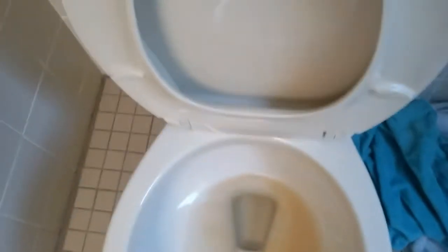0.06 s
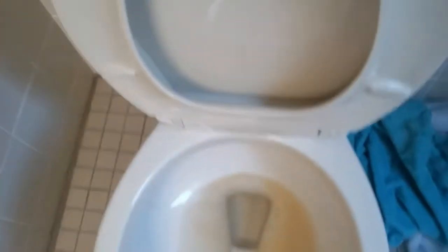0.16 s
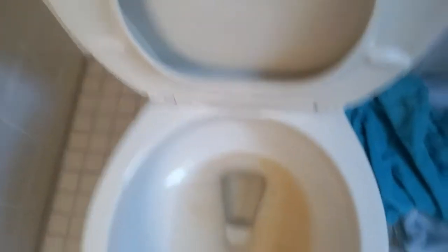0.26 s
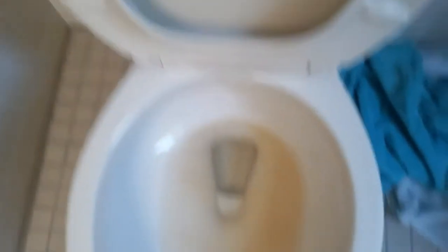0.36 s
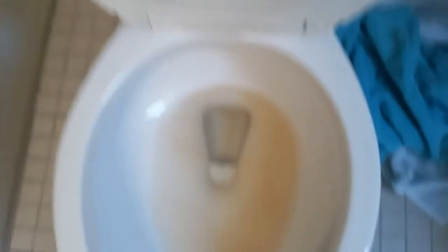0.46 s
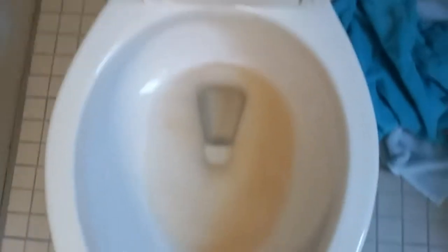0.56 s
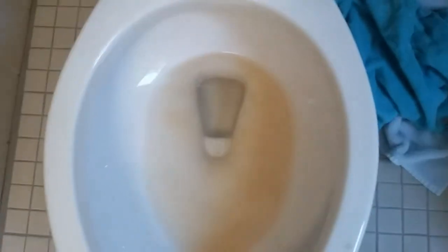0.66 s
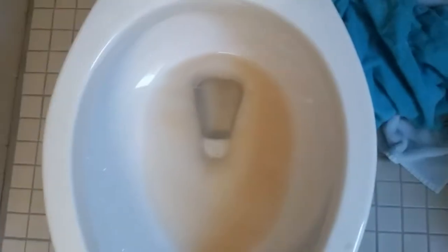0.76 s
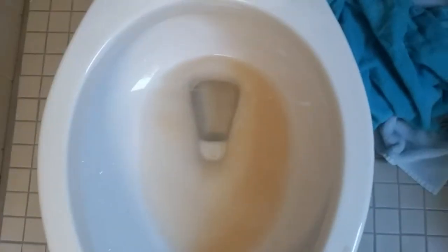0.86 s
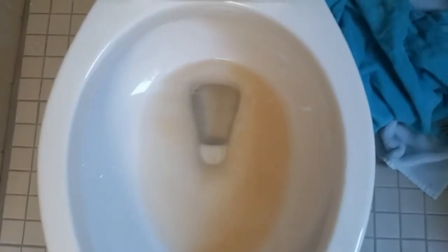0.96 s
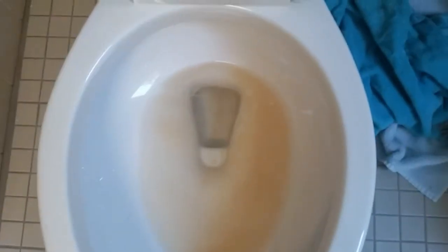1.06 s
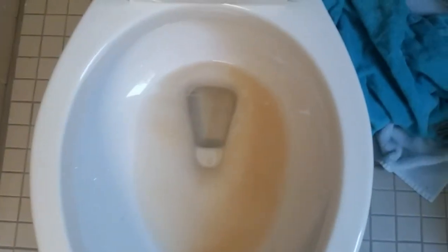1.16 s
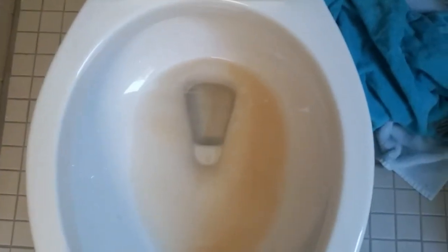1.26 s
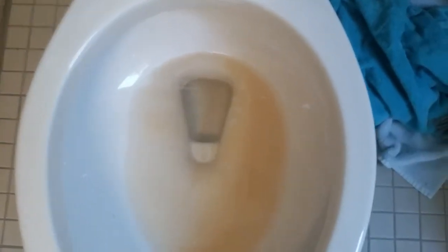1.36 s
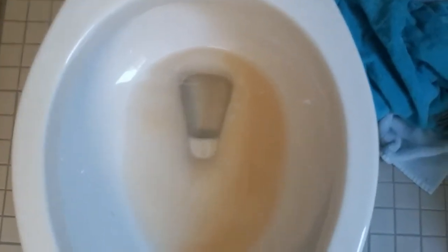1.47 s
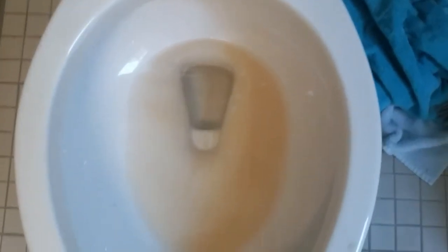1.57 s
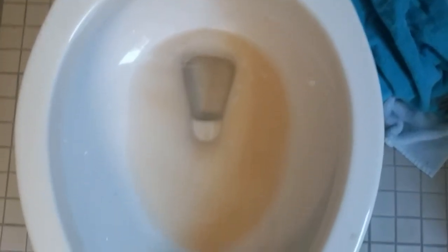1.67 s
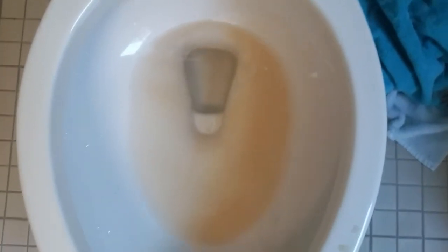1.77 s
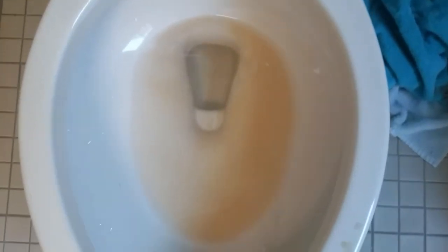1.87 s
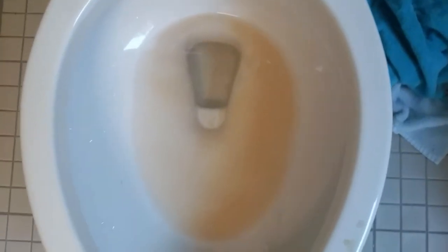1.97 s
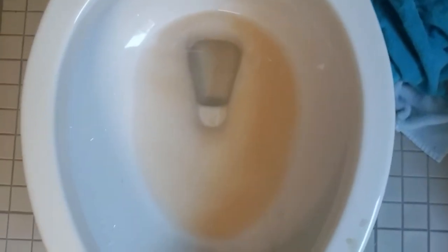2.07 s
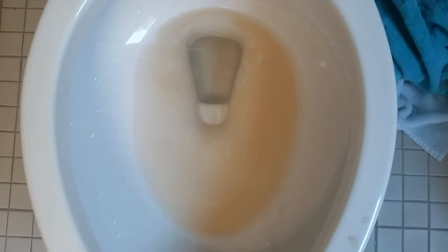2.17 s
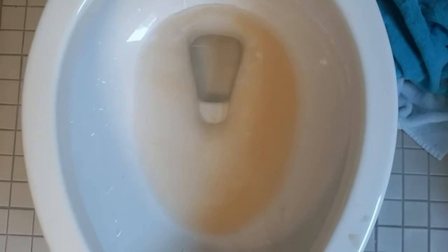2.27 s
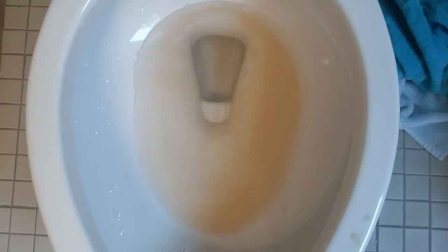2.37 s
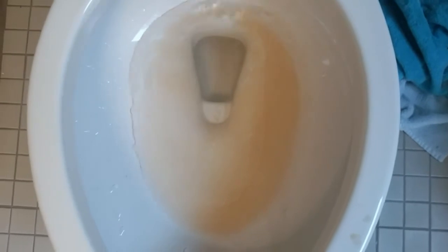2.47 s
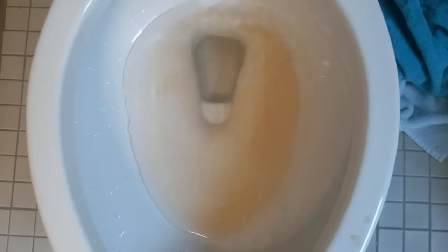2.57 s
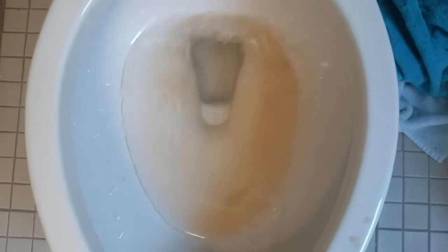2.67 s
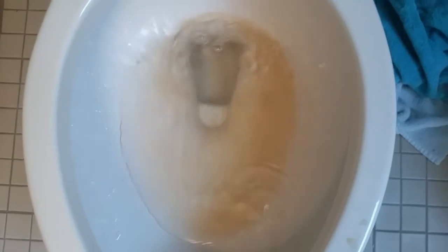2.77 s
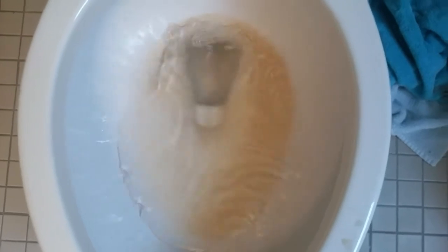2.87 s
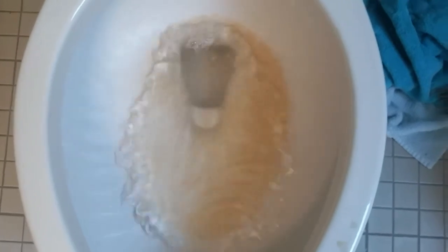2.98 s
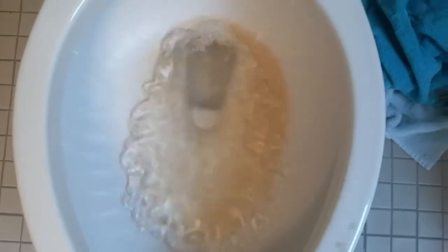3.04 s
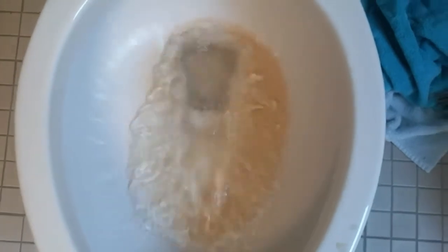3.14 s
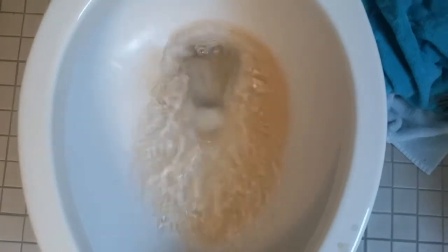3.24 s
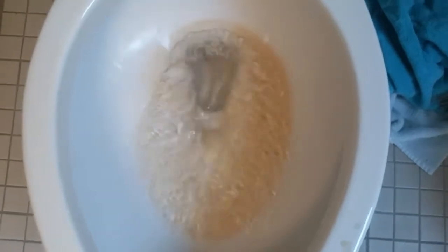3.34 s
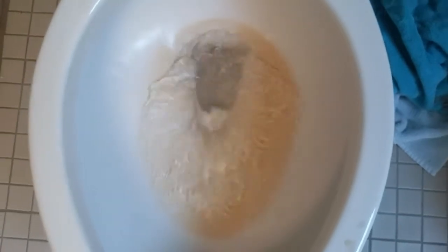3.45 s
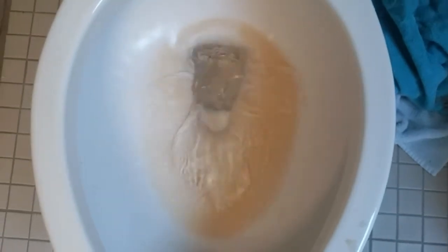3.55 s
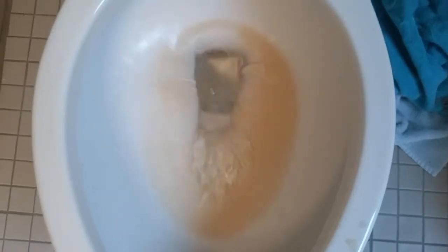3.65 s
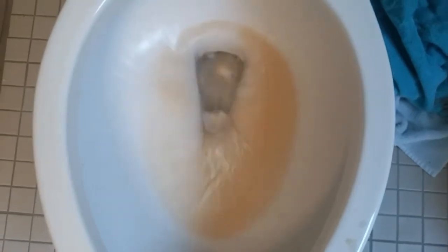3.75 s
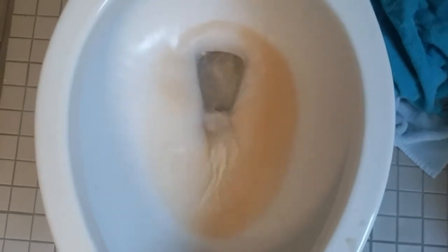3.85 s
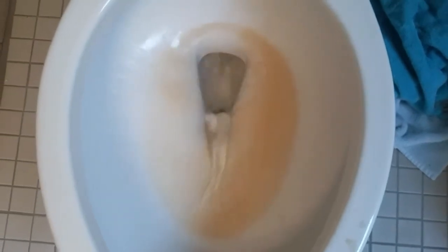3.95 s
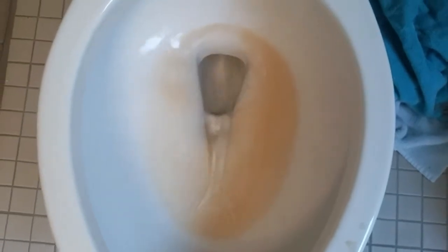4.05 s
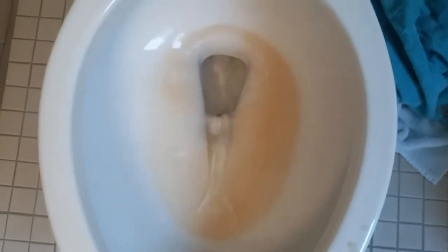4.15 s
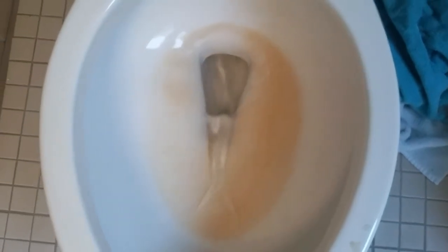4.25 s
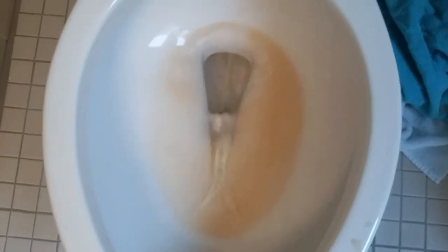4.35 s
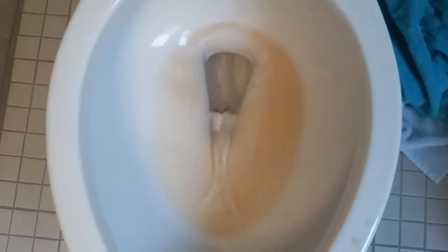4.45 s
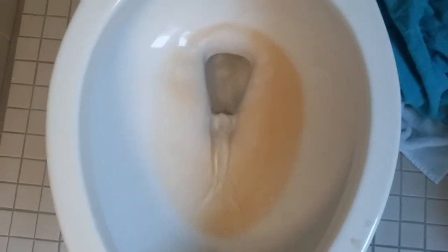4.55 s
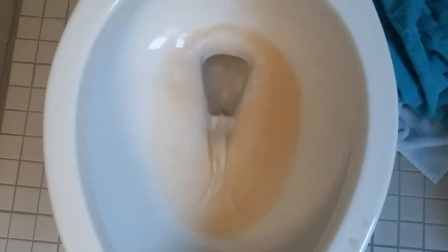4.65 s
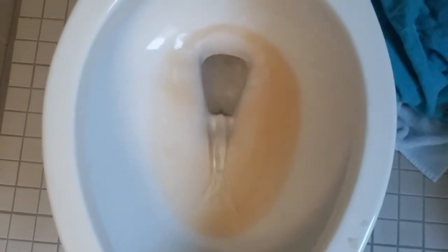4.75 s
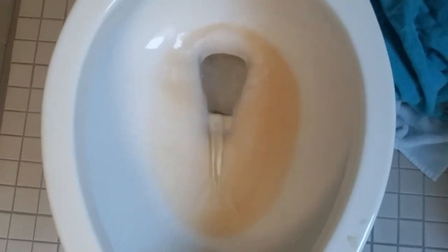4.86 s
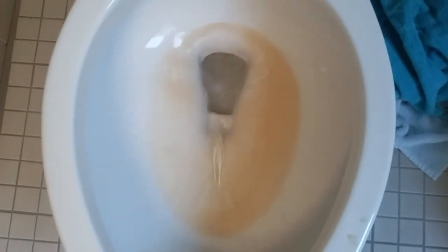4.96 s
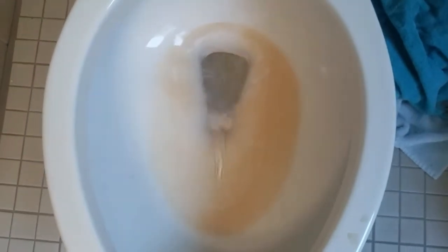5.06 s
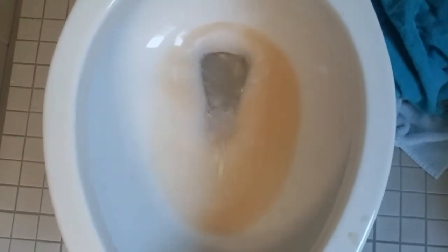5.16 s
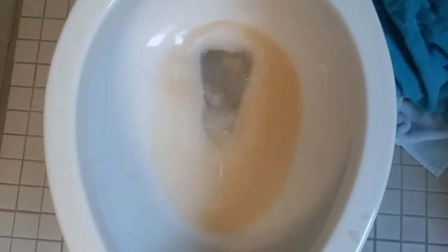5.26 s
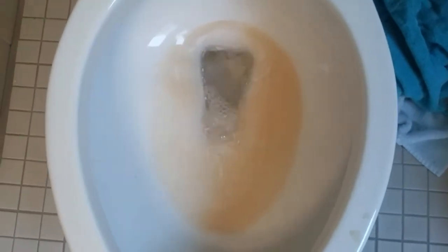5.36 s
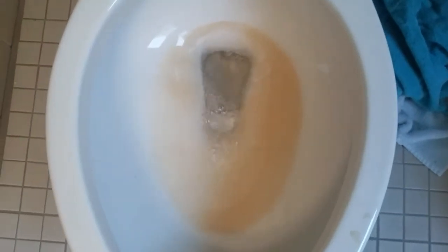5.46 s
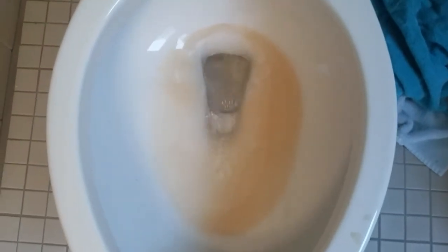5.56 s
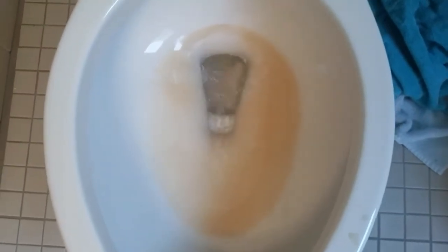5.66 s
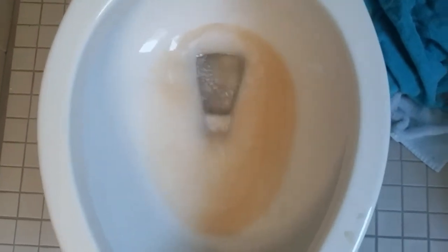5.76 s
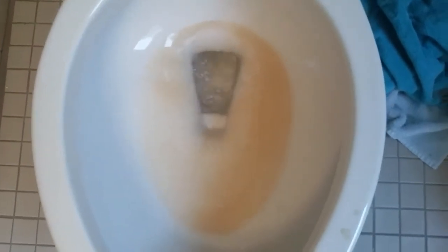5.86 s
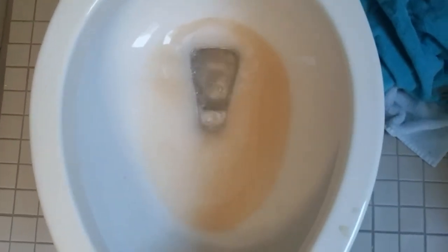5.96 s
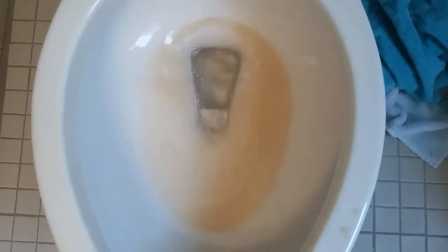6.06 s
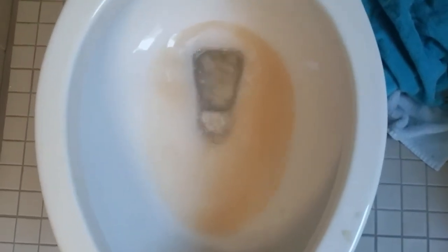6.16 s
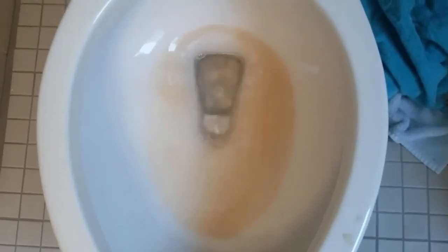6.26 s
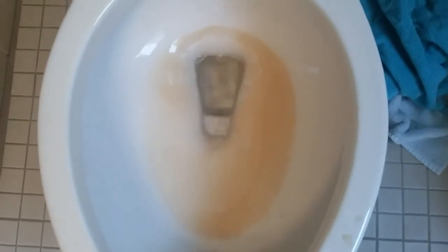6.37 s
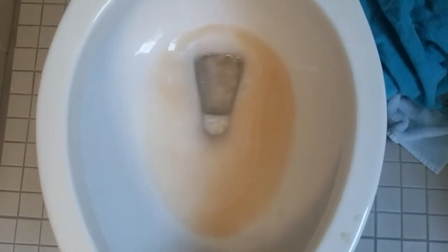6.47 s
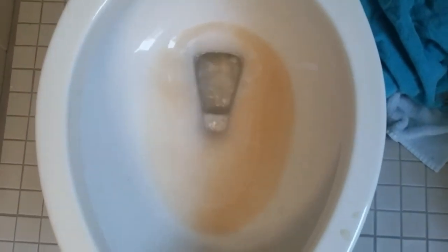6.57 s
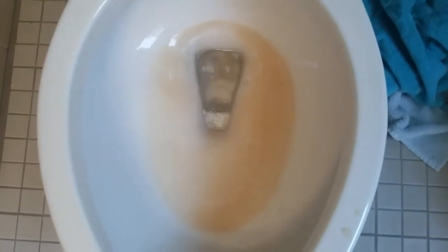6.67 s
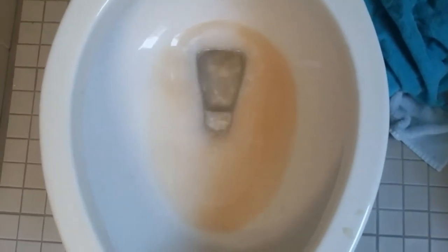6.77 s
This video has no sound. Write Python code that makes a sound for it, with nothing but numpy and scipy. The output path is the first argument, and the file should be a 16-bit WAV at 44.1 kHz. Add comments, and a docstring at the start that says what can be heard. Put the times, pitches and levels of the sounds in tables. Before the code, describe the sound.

Water surges into a toilet bowl and drains with loud, bubbly gulps, fading to a faint trickle and a few small pops.

```python
"""A small tiled bathroom, heard from above the bowl as the toilet is flushed.
Jets of water rush from the rim and surge. Then the siphon (the suction that empties the bowl)
breaks in a row of loud gulps of air. The trap (the bend that holds water) refills quietly and
two late bubbles pop. Moving water is noise coloured by the air spaces around it; trapped air
rings as short tones, and the tiles add a brief echo."""
import sys
import numpy as np
from scipy import signal
from scipy.io import wavfile
from scipy.ndimage import uniform_filter1d

SR = 44100
rng = np.random.default_rng(int(sys.argv[2]) if len(sys.argv) > 2 else 0)


def store_wav(level_fs):
    """Save 16-bit WAV to argv[1]."""
    pcm = np.round(np.clip(np.atleast_2d(level_fs), -1, 1) * 32767)
    wavfile.write(sys.argv[1], SR, pcm.T.astype(np.int16))


N = 300781
TIME = np.arange(N) / SR


def gain_of(db):
    return 10 ** (np.asarray(db) / 20)


def unit_rms(x):
    return x / np.sqrt(np.mean(x ** 2) + 1e-20)


def add(mix, at, sound):
    part = mix[round(at * SR):][:len(sound)]
    part += sound[:len(part)]


def swell_and_fade(rise, t60):
    """A level that climbs for `rise` seconds, then falls 60 dB in `t60` seconds."""
    t = np.arange(0, rise + t60, 1 / SR)
    return np.minimum(t / rise, 1) * gain_of(-60 * np.maximum(t - rise, 0) / t60)


def colour(x, tone, resonances):
    """Filters x by a broad tone curve plus narrow peaks; their dB set the shape, not the loudness."""
    size = 16384
    hz = abs(np.fft.fftfreq(size, 1 / SR)) + 1
    f, db = np.transpose(tone)
    octaves_outside = np.log2(np.maximum(f[0] / hz, 1)) + np.log2(np.maximum(hz / f[-1], 1))
    level = np.interp(np.log(hz), np.log(f), db) - 40 * octaves_outside
    for peak_hz, width, lift_db in resonances:
        level += lift_db / (1 + (2 * (hz - peak_hz) / width) ** 2)
    log_gain = np.log(gain_of(np.maximum(level - level.max(), -100)))
    response = np.exp(np.conj(signal.hilbert(log_gain)))  # rings after a hit, never before
    taps = np.fft.ifft(response).real[:size // 2]
    return signal.oaconvolve(x, taps / np.linalg.norm(taps))[:N]


def flicker(depth_db, span_s):
    """The uneven level wobble of moving water."""
    span = int(span_s * SR)
    wobble = uniform_filter1d(uniform_filter1d(rng.standard_normal(N), span), span)
    return gain_of(depth_db * unit_rms(wobble))


def churn(per_s, spread_db, drop_share):
    """The noise of swirling water, mixed with separate drop hits of uneven size."""
    noise, chance, size = rng.standard_normal(N), rng.random(N), rng.exponential(1, N)
    drops = np.sign(noise) * gain_of(spread_db * np.minimum(size, 4)) * (chance < per_s / SR)
    return np.sqrt(1 - drop_share) * noise + np.sqrt(drop_share) * unit_rms(drops)


def gurgle(per_s, low_hz, high_hz, cycles, climb):
    """A crowd of little bubbles, each a short rising tone; smaller ones sound higher."""
    out = np.zeros(N)
    slot = np.floor(20 * rng.random(N) * SR / per_s)  # slots 0-19 start a bubble, one pitch each
    strength = gain_of(3.5 * np.minimum(rng.exponential(1, N), 3))
    for k, hz in enumerate(np.geomspace(low_hz, high_hz, 20)):
        turns = np.arange(0, 2 * cycles, hz / SR)
        shape = np.exp(-2.5 * turns / cycles) * (1 - np.exp(-turns))
        tone = shape * np.sin(2 * np.pi * turns * (1 + climb * turns))
        out += signal.oaconvolve(strength * (slot == k), tone / np.linalg.norm(tone))[:N]
    return unit_rms(out)


def shaken_tone(at, pitch, swirl, rough, spread):
    """A tone that is part clean, part swirl noise in a band about `spread` times its pitch wide."""
    turn = np.exp(2j * np.pi * np.cumsum(pitch) / SR)
    pole = np.exp(-np.pi * spread * np.mean(pitch) / SR)
    fuzz = swirl[round(at * SR):][:len(pitch)]
    for _ in range(2):  # shift the pitch down to zero, smooth, shift back
        fuzz = (turn * signal.lfilter([1 - pole], [1, -pole], fuzz / turn)).real
    return (1 - rough) * turn.imag + rough * unit_rms(fuzz)


# Tone curve of the quiet background: f/Hz, level/dB
HUSH_TONE = [(12, -33), (20, 11), (32, -34), (86, -3.5), (142, -15.5), (328, -15), (780, -22), (1440, -26),
             (1710, -23.5), (1960, -25), (3340, -32), (9140, -29.5), (16000, -28.5)]

def hush():
    """The faint, steady noise of room and microphone."""
    return gain_of(-71) * colour(rng.standard_normal(N), HUSH_TONE, [(110, 42, 3.3)])


# Deep thuds in the drain: t/s, level/dB, f/Hz, time to fade 60 dB/s
THUDS = [(1.895, -44, 85, .3), (2.019, -34.5, 83.4, 0.23), (3.148, -32, 100.4, 0.25),
         (3.269, -47, 80, 0.28), (4.118, -36, 114, 0.24), (4.822, -38, 85.2, 0.52)]

def thuds():
    """The column of water in the drain swells into a low ring."""
    out = np.zeros(N)
    for at, db, hz, t60 in THUDS:
        shape = swell_and_fade(.015, t60)
        add(out, at, gain_of(db) * shape * np.sin(2 * np.pi * hz * TIME[:len(shape)]))
    return out


# Steady churning under the bursts: t/s, rush level/dB, slosh level/dB, spray level/dB
FLOW = [(1.9, -50, -42, -67.5), (2.03, -55.5, -39, -56), (2.09, -40.5, -43.5, -43),
        (2.2, -38.5, -24.5, -45), (2.3, -37.5, -29, -52.5), (2.4, -43, -37.5, -45.5),
        (2.55, -49, -46, -56.5), (2.84, -50, -56, -59.5), (2.93, -39, -35, -49), (3.1, -43, -50.5, -51),
        (3.3, -46.5, -43, -54.5), (3.7, -61, -53, -64), (3.86, -43.5, -45.5, -58), (4.0, -41, -34, -50.5),
        (4.2, -37.5, -37, -48.5), (4.5, -43, -38, -53.5), (4.8, -42, -44.5, -51), (5.0, -41, -49, -50.5),
        (5.15, -55, -55, -63.5), (5.35, -65, -62.5, -70), (5.6, -73, -65, -76.5),
        (6.82, -72.5, -67.5, -81.5)]

def flow_power(opening_s=.013):
    """The water starts suddenly, surges and dies down: power curves for rush, slosh and spray."""
    times, *levels = np.transpose(FLOW)
    running = np.clip((TIME - times[0]) / opening_s, 0, 1)
    return np.array([(running * gain_of(np.interp(TIME, times, db))) ** 2 for db in levels])


# Bursts of water and air: t/s, rush level/dB, slosh level/dB, spray level/dB,
# time for the rush to fade 60 dB/s, air pocket f/Hz, air pocket level/dB
BURSTS = [(1.9, -55.5, -39, -70, .6, 347, -42), (2.016, -53, -30.5, -50.5, .1, 255, -22.5),
          (2.085, -59, -60, -53, .3, 1437, -28.5), (2.148, -33.5, -46, -40.5, .6, 547, -26),
          (2.202, -40, -48, -44, .074, 553, -13.5), (2.212, -45, -52, -66, .074, 557, -10.5),
          (2.301, -75, -50.5, -56, .1, 793, -23.5), (2.397, -30, -48, -41.5, .09, 431, -18),
          (2.418, -27, -27.5, -23, .2, 949, -15), (2.545, -40, -62, -49, .3, 1850, -33),
          (2.861, -42.5, -60, -70, .48, 2330, -40), (2.903, -36, -60, -37, .24, 251, -29.5),
          (2.958, -57, -56, -40, .6, 2500, -24.5), (2.995, -54, -65, -59.5, .084, 2050, -24.5),
          (3.131, -45, -60, -68, .18, 2270, -28), (3.156, -28, -29, -32, .15, 265, -20.5),
          (3.222, -60, -60, -40, 0.26, 244, -40), (3.247, -60, -65, -63, .2, 2240, -37),
          (3.325, -40.5, -42, -74, .2, 228, -32), (3.397, -49, -65, -71, .23, 1120, -34),
          (3.514, -48, -38.5, -60, .29, 963, -34.5), (3.664, -51, -49, -57, .19, 992, -33.5),
          (3.73, -56, -67, -45.5, .083, 1740, -35.5), (3.774, -62, -65, -52.5, .4, 2110, -31),
          (3.813, -38.5, -42.5, -49.5, .5, 1380, -28.5), (3.858, -44, -49.5, -62, .25, 1140, -20.5),
          (3.902, -40, -39.5, -66, .18, 602, -24.5), (3.942, -32, -35, -42, .18, 321, -23),
          (4.006, -23, -45.5, -35.5, 0.23, 1554, -13), (4.027, -27, -51, -59, .06, 625, -11.5),
          (4.091, -36, -54.5, -62.5, .11, 285, -24.5), (4.131, -14.5, -48, -30, .11, 644, -12.5),
          (4.256, -20.5, -53.5, -55, .24, 601, -13.5), (4.266, -20.5, -40.5, -40.5, .28, 1466, -9.5),
          (4.274, -26, -55, -52, 0.14, 665, -9), (4.344, -30.5, -31, -53, .23, 256.7, -11.5),
          (4.355, -26, -54, -36, .17, 275, -20), (4.408, -51, -48, -65.5, .18, 263, -34.5),
          (4.517, -18.5, -21.5, -33.5, .18, 637, -8.5), (4.545, -41, -58, -41.5, .082, 585, -5.5),
          (4.59, -37.5, -57.5, -38.5, .075, 414, -15.5), (4.646, -30, -34, -36, .16, 1030, -19),
          (4.657, -24, -25.5, -37.5, .17, 589, -18), (4.811, -19.5, -57.5, -33, 0.11, 1424, -10.5),
          (4.914, -57, -65, -62, .15, 1170, -30.5), (4.991, -27.5, -53, -36.5, .13, 236, -25.5),
          (5.058, -40, -62, -43.5, .45, 224, -34.5), (5.105, -41, -67, -35.5, .14, 2260, -29.5),
          (5.124, -55, -73, -58, .2, 1960, -29.5), (5.19, -71, -75, -82, .18, 2300, -48),
          (5.256, -46.5, -65, -55.5, .2, 523, -36), (5.278, -45.5, -62, -70, .084, 457, -40),
          (5.548, -61.5, -66, -66, .15, 340, -51.5), (5.902, -63, -69, -80, .2, 1242, -56),
          (5.929, -59.5, -59, -64, .15, 1140, -38), (6.072, -60, -77, -64.5, .13, 660, -69),
          (6.112, -57, -80, -66, .14, 1685, -41.5), (6.498, -74, -76, -85, .15, 608, -59)]
RISE_S = .0032

def burst_power():
    """Power curves of the bursts: heavy slosh moves slower than the rush, fine spray faster."""
    power = np.zeros((3, N))
    for at, *levels, t60, _, _ in BURSTS:
        for layer, db, stretch in zip(power, levels, (1, 1.3, .6)):
            shape = swell_and_fade(stretch * RISE_S, stretch * t60)
            add(layer, at - RISE_S / 2, (gain_of(db) * shape) ** 2)
    return power


def air_pockets(swirl):
    """Each burst traps a pocket of air that rings while its pitch creeps up."""
    out = np.zeros(N)
    for at, *_, hz, db in BURSTS:
        shape = swell_and_fade(RISE_S, t60=18 / hz + .067)
        small = min(hz / 2200, 1)  # small pockets climb faster and break into froth
        pitch = hz * (1 + .085 * small * np.linspace(-.5, 1.5, len(shape)))
        tone = shaken_tone(at, pitch, swirl, rough=.1 + .75 * small ** 2, spread=.08 + .2 * small ** 2)
        add(out, at, gain_of(db) * shape * tone)
    return out


def stage_fades(siphon_s=3.72, refill_s=5.3, fade_s=.1):
    """Volume curves that blend the three stages of the flush: jets, siphon, refill."""
    caught, filling = (np.clip((TIME - at) / fade_s, 0, 1) for at in (siphon_s, refill_s))
    return np.sqrt([1 - caught, caught * (1 - filling), filling])


# Tone curves of the rush in each stage: f/Hz, level/dB
JETS_TONE = [(240, -38.5), (400, -2.5), (542, 2), (850, -2), (967, -0.5), (1070, 0.5), (1870, -5.5),
             (3600, -22), (4680, -46), (7920, -120)]
SIPHON_TONE = [(240, -23), (400, -4.5), (490, -14.5), (622, -10.5), (932, -5.5), (1600, -4), (1980, -8),
               (3600, -20.5), (4680, -56.5), (7920, -120)]
REFILL_TONE = [(240, -8), (400, -0.5), (599, 0), (747, -10), (1190, -7.5), (1440, -1.5), (1680, -5.5),
               (3600, -14.5), (4680, -55), (7920, -120)]
# Pitches at which the air rings in the rim channel, open trap and filling trap: f/Hz, width/Hz, lift/dB
RIM_AIR = [(637, 51, 9.5), (976, 27, 15.5), (1268, 45, 13), (1580, 17, 11), (1851, 32, 11),
           (2088, 24, 11.5), (2360, 720, 13)]
OPEN_TRAP_AIR = [(626, 150, 9.5), (837, 40, 3.1), (1150, 83, 5), (1347, 15, 7.8), (1580, 140, 6.6),
                 (2415, 550, 7.3)]
FILLING_TRAP_AIR = [(507, 16, 10), (602, 13.6, 15), (940, 35.4, 13.6), (1140, 21, 9.2), (1431, 45.5, 11.8),
                    (1973, 105, 9.5)]

def rush(stage_levels):
    """Fast, bubbly water sounds through a different air space in each stage."""
    water = churn(per_s=1500, spread_db=3, drop_share=.2)
    water += gain_of(-8) * gurgle(per_s=500, low_hz=400, high_hz=2600, cycles=9, climb=.006)
    spaces = (JETS_TONE, RIM_AIR), (SIPHON_TONE, OPEN_TRAP_AIR), (REFILL_TONE, FILLING_TRAP_AIR)
    return sum(colour(level * water, tone, air) for level, (tone, air) in zip(stage_levels, spaces))


# Tone curves of the slosh, one per stage: f/Hz, level/dB
SLOSH_TONES = [
    [(12, -59.5), (20, -27.5), (32, -48), (70, -11), (157, -3.5), (306, 2), (436, 1.5), (520, -0.5),
     (680, -32), (1140, -120)],
    [(12, -66), (20, -35.5), (43, -35.5), (76, -9.5), (182, -11.5), (252, 6.5), (380, -3.5), (520, -4.5),
     (680, -35), (1140, -120)],
    [(12, -47), (20, -22), (49, -32), (66, -18), (113, 2.5), (168, -1.5), (214, -6.5), (520, -12.5),
     (680, -61), (1140, -120)],
]

def slosh(stage_levels):
    """Heavy water rocks in the trap with a low rumble."""
    water = flicker(depth_db=2.3, span_s=.042) * churn(per_s=150, spread_db=1.4, drop_share=.15)
    peaks = [(80, 4.7, 3.5), (120, 12, 5.8), (153, 34, 6.9), (285, 76, 1.5), (320, 57, 3.7)]
    return sum(colour(level * water, tone, peaks) for level, tone in zip(stage_levels, SLOSH_TONES))


# Tone curves of the spray, one per stage: f/Hz, level/dB
SPRAY_TONES = [
    [(1880, -3), (3200, -7), (5060, -5.5), (5710, -6.5), (6800, -8.5), (8670, -12.5), (13500, -14),
     (16000, -29)],
    [(1880, -5.5), (3200, -0.5), (3690, -2.5), (4890, 0), (7130, -7), (11000, -10.5), (13300, -9.5),
     (16000, -17.5)],
    [(1880, -35.5), (3200, -11), (3740, -8), (4670, -5.5), (13100, -8), (16000, -21)],
]

def spray(stage_levels, wobble, droplets_db=(-17.5, -7, -11)):
    """Fine spray hisses, with tiny ringing droplets mixed in by a different amount in each stage."""
    droplets = gurgle(per_s=220, low_hz=3500, high_hz=14000, cycles=30, climb=.001)
    hiss = wobble * flicker(depth_db=1.5, span_s=.003)
    hiss *= churn(per_s=1500, spread_db=3.5, drop_share=.15)
    peaks = [(4093, 150, 5.1), (4670, 300, 4.5), (13280, 2700, 5.2)]
    return sum(colour(level * (hiss + gain_of(db) * droplets), tone, peaks)
               for level, tone, db in zip(stage_levels, SPRAY_TONES, droplets_db))


# Droplets that ping on their own: t/s, level/dB, f/Hz
PINGS = [(2.399, -25.5, 7850), (2.417, -18.5, 5220), (2.981, -30, 5640), (3.156, -23, 13500),
         (3.786, -40.5, 5200), (3.789, -42, 13100), (3.833, -38.5, 13300), (4.052, -42, 13600),
         (4.065, -33.5, 12900), (4.111, -27.5, 11200), (4.35, -29, 9600), (4.723, -40, 6170),
         (4.991, -35, 6020), (5.041, -37, 5200), (5.072, -41, 4000), (5.076, -35, 6300),
         (4.616, -36.5, 5000)]

def pings(swirl, glaze_hz=4900):
    """Short, high pings: lone droplets, plus one that each burst flings at the bowl's glaze."""
    out = np.zeros(N)
    flung = [(at, spray_db - 6.5, glaze_hz * rng.uniform(.95, 1.07)) for at, _, _, spray_db, *_ in BURSTS]
    shape = swell_and_fade(.001, t60=.025)
    for at, db, hz in PINGS + flung:
        tone = shaken_tone(at, np.full(len(shape), hz), swirl, rough=.8, spread=.18)
        add(out, at, gain_of(db) * shape * tone)
    return out


# Single bubbles: t/s, level/dB, first f/Hz, last f/Hz, length/s
BUBBLES = [(2.434, -26, 971, 935, 0.023), (3.136, -28.5, 2080, 3540, 0.017), (4.005, -13, 1773, 590, 0.043),
           (4.144, -29, 727, 649, 0.054), (4.269, -19, 1229, 1337, 0.045),
           (4.345, -22.5, 1150, 1146, 0.023), (4.462, -31, 1328, 1340, 0.024),
           (5.926, -43, 1074, 1665, 0.03), (5.927, -54.5, 3040, 2860, 0.022),
           (6.072, -52, 4750, 4570, 0.019), (6.099, -43.5, 861, 1940, 0.021)]

def bubbles(swirl):
    """A bubble's pitch slides as it grows or reaches the surface, and the tone stops as it pops."""
    out = np.zeros(N)
    for at, db, first_hz, last_hz, length in BUBBLES:
        pitch = np.geomspace(first_hz, last_hz, int(length * SR))
        spread = .06 + .2 * abs(np.log(last_hz / first_hz))  # a big slide sounds rougher
        tone = shaken_tone(at, pitch, swirl, rough=.45, spread=spread)
        add(out, at, gain_of(db) * signal.windows.tukey(len(pitch), .6) * tone)
    return out


# Sharp snaps during the gulps: t/s, level/dB, f/Hz
SNAPS = [(4.133, -12, 2130), (4.263, 1.5, 1600), (4.36, -17.5, 2996)]

def snaps():
    """A film of water tears with a click only a wave or two long."""
    out = np.zeros(N)
    for at, db, hz in SNAPS:
        turns = np.arange(-1, 2, hz / SR)
        add(out, at - 1 / hz, gain_of(db) * np.exp(-turns ** 2) * np.sin(2 * np.pi * turns))
    return out


def tile_echo(x, low_t60=.35, high_t60=.3):
    """Sound bounces off the tiles as many small echoes; the treble dies sooner."""
    taps = np.zeros(SR // 2)
    slots = np.arange(200, len(taps) - 20, 20)
    taps[slots + rng.integers(0, 20, len(slots))] = rng.choice([-1., 1.], len(slots))
    hz, t, spectrum = signal.stft(taps, SR, nperseg=256)
    t60 = np.interp(hz, [500, 6000], [low_t60, high_t60])[:, None]
    tail = signal.istft(spectrum * gain_of(-60 * t / t60), SR, nperseg=256)[1]
    return signal.fftconvolve(x, tail / np.linalg.norm(tail))[:N]


def scene():
    """The flush, its echo and the background hush, in one channel."""
    rush_level, slosh_level, spray_level = np.sqrt(flow_power() + burst_power())
    stages = stage_fades()
    wobble = flicker(depth_db=1.5, span_s=.012)  # rush and spray waver together
    flush = thuds() + rush(stages * rush_level * wobble)
    flush += slosh(stages * slosh_level) + spray(stages * spray_level, wobble)
    swirl = rng.standard_normal(N)  # the same swirling water shakes pockets, pings and bubbles
    flush += air_pockets(swirl) + pings(swirl) + bubbles(swirl) + snaps()
    return (hush() + flush + gain_of(-14) * tile_echo(flush))[None]


def record(dry):
    """Clips any peak above full scale, then cuts the very highest treble."""
    lowpass = signal.firwin(511, 16050, window=("kaiser", 9), fs=SR)
    return signal.oaconvolve(np.clip(dry, -1, 1), lowpass[None], "same")


dry = scene()
out = record(dry)
store_wav(out)
```